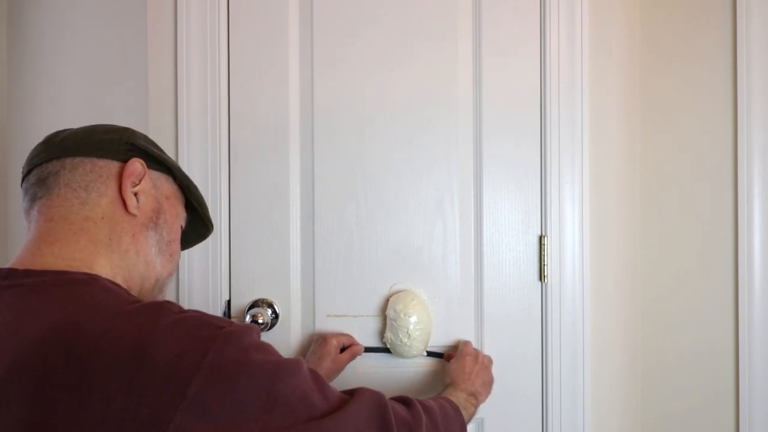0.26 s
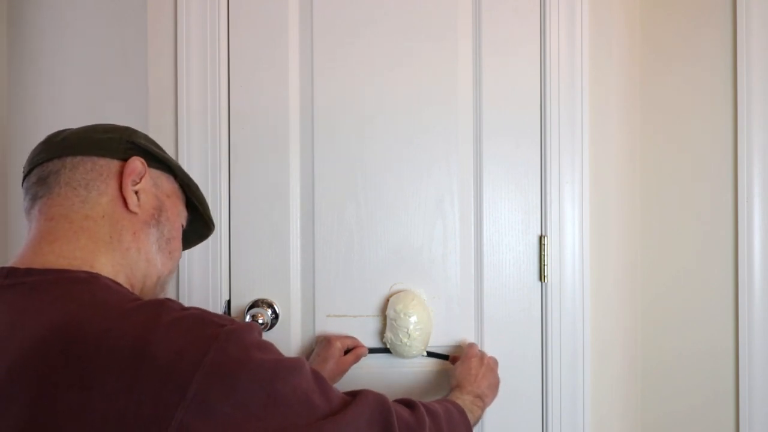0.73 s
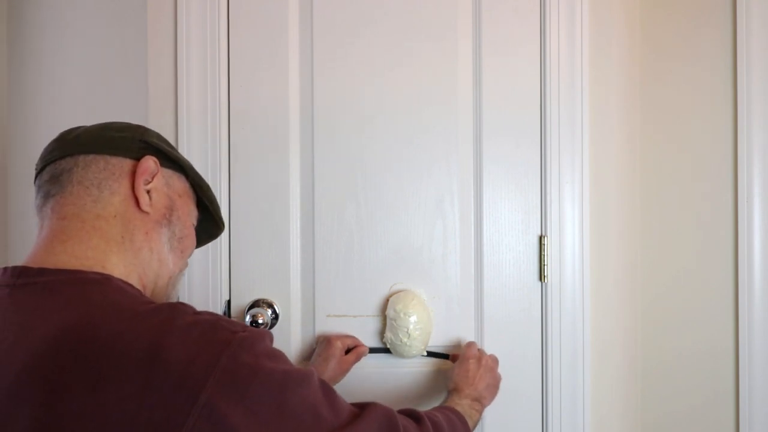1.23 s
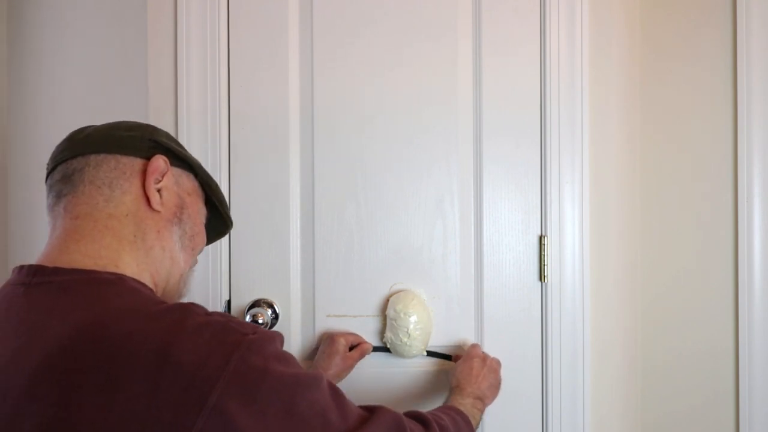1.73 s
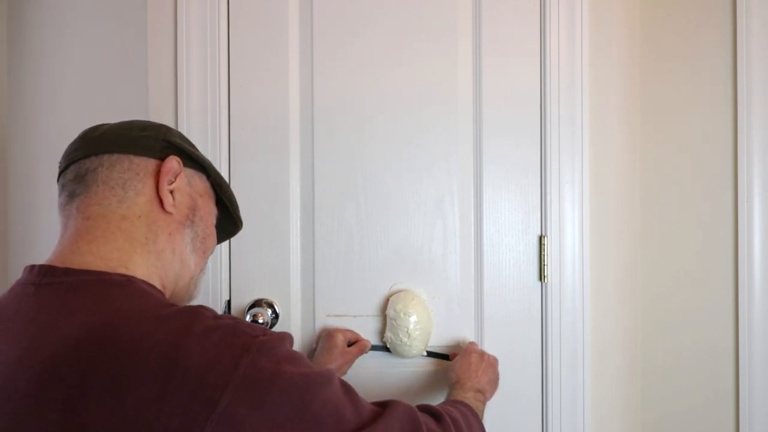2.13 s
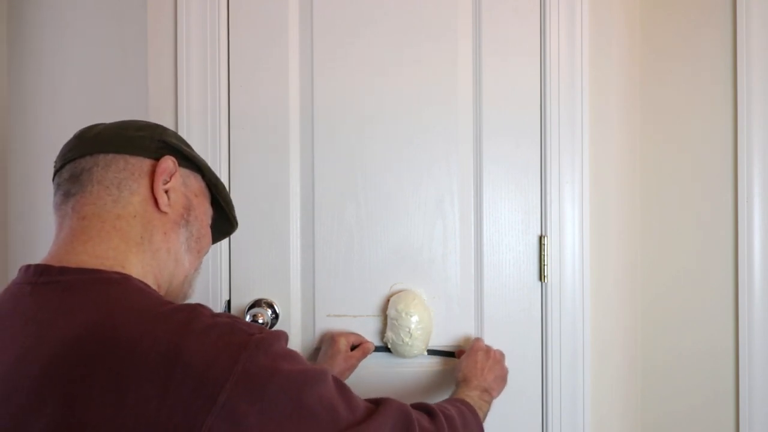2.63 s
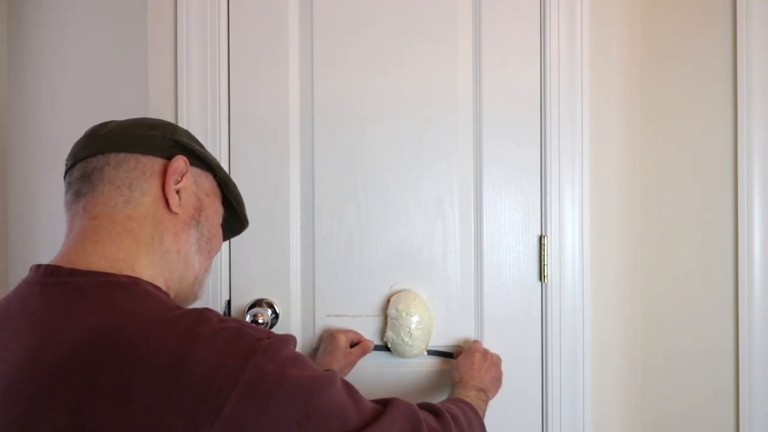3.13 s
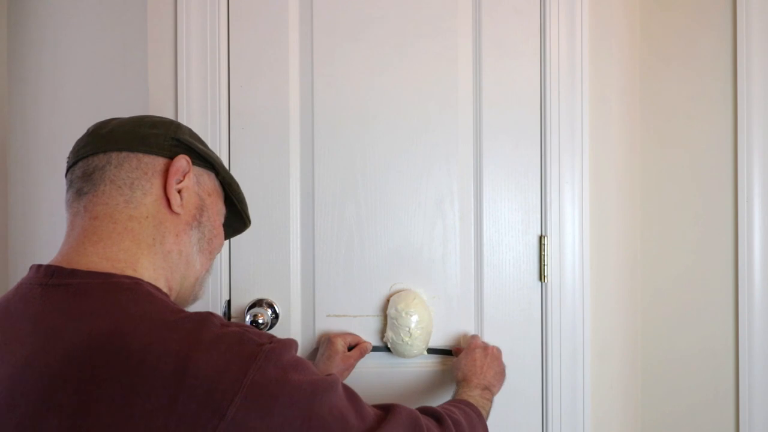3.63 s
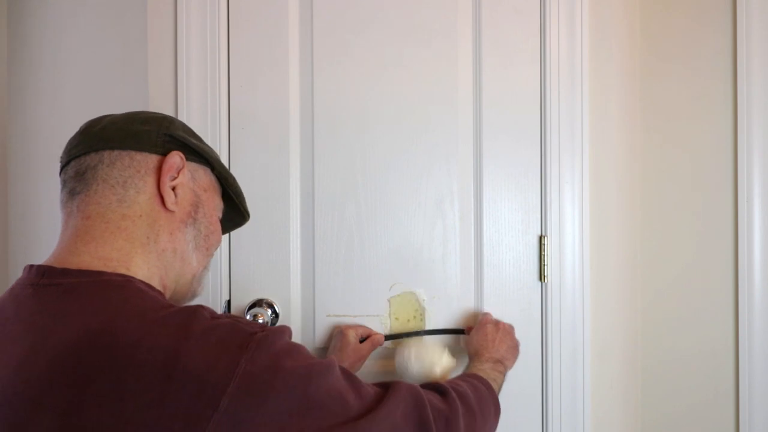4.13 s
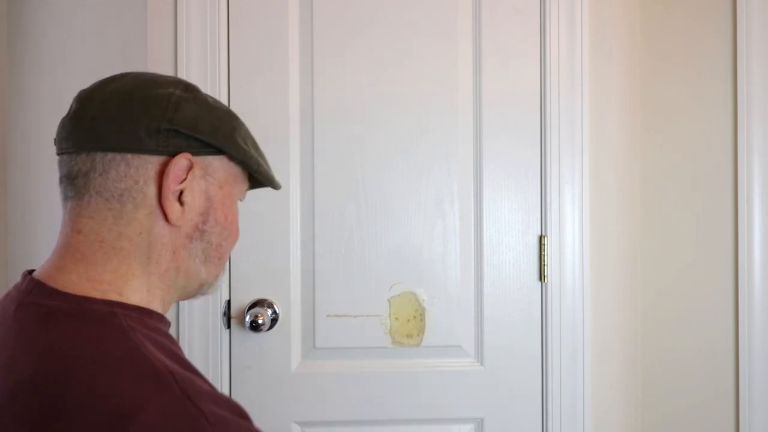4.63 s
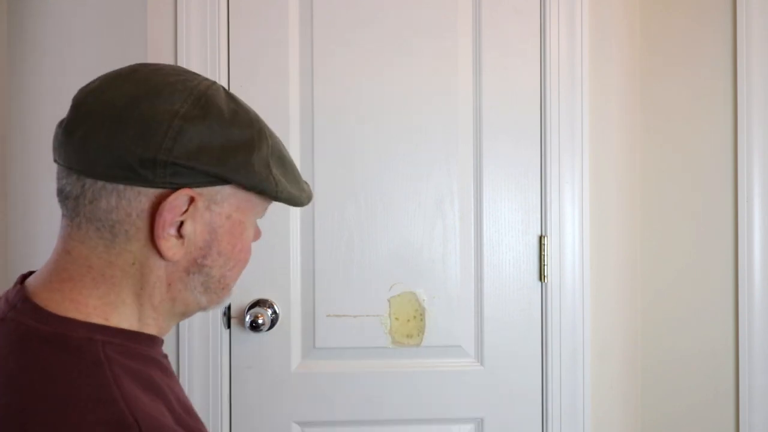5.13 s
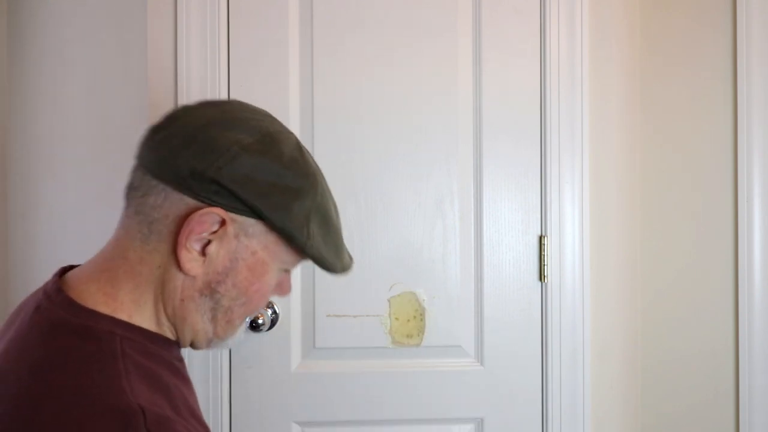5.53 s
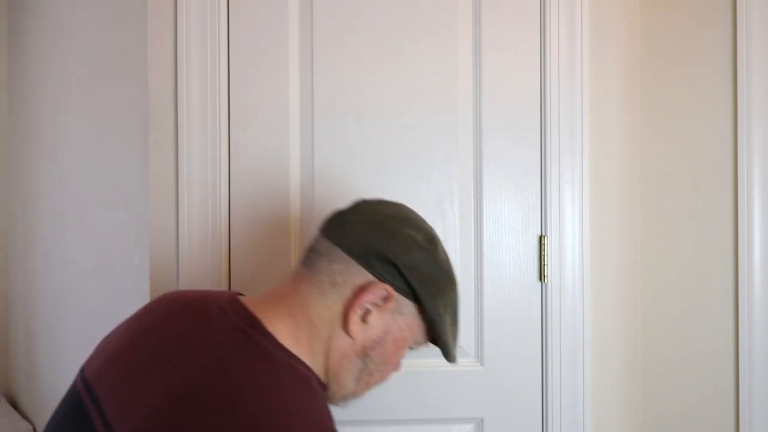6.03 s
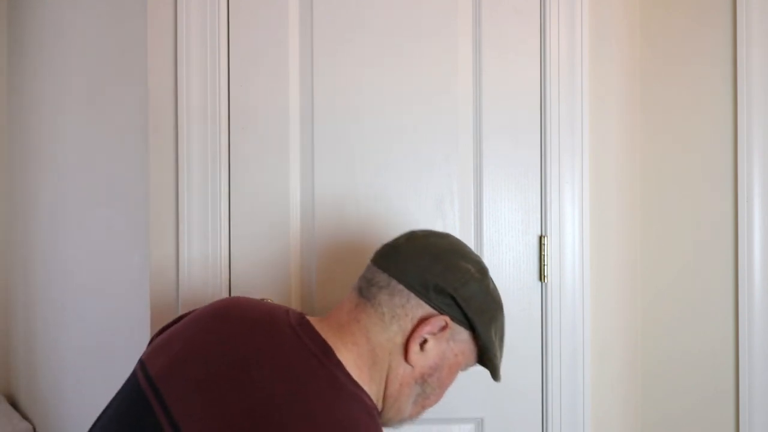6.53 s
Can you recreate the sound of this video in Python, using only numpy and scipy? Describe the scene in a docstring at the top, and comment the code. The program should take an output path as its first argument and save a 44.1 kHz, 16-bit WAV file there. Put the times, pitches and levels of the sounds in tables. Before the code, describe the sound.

A bare saw blade scrapes hard foam on a hollow door in scattered strokes, snaps it free, and the lump drops and bounces in a hallway.

```python
"""Hacksaw blade on hard foam, against a hollow door

A bare hacksaw blade, held flat against a hollow door, saws off a lump of hard foam in short strokes.
Random clicks and hiss are filtered into rasp, tearing and panel boom; bursts that ring modes make the foam
snaps and the lump's drop and bounces; rubs make its roll, the shuffling and the clothes. Gliding sines
squeak, and the bare blade pings. A bare hallway rings on; one microphone with a presence peak hears it.
"""
import sys
import numpy as np
from scipy import signal
from scipy.fft import rfft, irfft
from scipy.io import wavfile
from scipy.ndimage import uniform_filter1d

SR = 44100
rng = np.random.default_rng(int(sys.argv[2]) if len(sys.argv) > 2 else 0)


def ratio_of_db(decibels):
    """Turn decibels (scalar or array-like) into linear amplitude factors; 0 dB maps to 1."""
    return 10 ** (np.asarray(decibels, float) / 20)


def to_wav(sig):
    """Store sig (one row per channel, or 1-D mono) as 16-bit WAV at the path in sys.argv[1].

    Samples outside -1..1 are clipped; the rate is SR.
    """
    pcm = np.clip(np.atleast_2d(sig), -1, 1) * 32767
    pcm = np.round(pcm).astype(np.int16)
    wavfile.write(sys.argv[1], SR, pcm.T)  # frames by channels


N = 298539
T = np.arange(N) / SR  # seconds

# Foam snaps and knocks on the door. Each row: start in seconds, then the peaks of crack, treble, knock
# and thud in dB, before the four gains of the layer.
SNAPS = [(0.2797, -42, -59, -69, -60), (0.3176, -36.5, -65, -59, -60), (0.5493, -22, -47, -37, -37),
         (0.568, -11, -35, -20.5, -32), (0.5849, -27, -53, -11.5, -21.5), (0.9813, -35.5, -47, -60, -54),
         (1.176, -45, -52, -38, -43), (1.3254, -45, -60, -43, -31.5), (1.4072, -18.5, -37, -36, -40),
         (1.4293, -17, -33.5, -21.5, -52), (1.6895, -29, -47, -51, -64), (1.7175, -37, -47, -55, -54.5),
         (1.76, -26, -42.5, -31, -51), (2.0904, -34, -55, -36, -40), (2.1257, -12, -47, -29, -25.5),
         (2.1804, -21, -49, -28, -28), (2.2491, -23, -36, -33, -50), (2.6272, -5, -12, -50, -19.5),
         (3.006, -38, -50, -60, -66), (3.093, -33, -51, -62, -18.5), (3.121, -35, -66, -48, -49),
         (3.1584, -24.5, -44, -50, -26), (3.2589, -26, -36, -46, -42), (3.2834, -9, -25, -14.5, -13.5),
         (3.8368, -36, -39, -27, -10), (3.8543, -7, -23.5, -54, -32), (3.9499, 1.5, -18, -17, -11.5),
         (4.03, -6, -26.5, -14.5, -14), (4.0354, -31, -28.5, -20, -20), (4.3179, -33, -54, -37, -38)]
# The lump on the floor, and feet. Each row: start in seconds, then the peaks of crack, treble, knock
# and thud in dB, before the four gains of the layer.
BOUNCES = [(4.566, -2.5, -38, -9, -19), (4.8461, -7, -54, -10.5, -18.5), (4.9143, -17, -52, -15.5, -14),
           (4.964, -37, -46, -45, -44), (5.0502, -32, -53, -30.5, -44), (5.0679, -24.5, -56, -42, -39),
           (5.123, -24, -56, -50, -48.5), (5.1677, -28, -56.5, -35, -37), (5.212, -28, -43, -41.5, -50),
           (5.9046, -30, -53, -44.5, -53), (6.483, -27.5, -56, -44, -47.5), (6.6337, -19, -53, -40, -40.5)]
# Modes of the hollow door. Each row: frequency in Hz, relative level in dB, t60 in seconds.
DOOR = [(57, -11.5, 0.16), (89.1, -6, 0.29), (131, -1, 0.043), (171, 5, 0.087), (228, -0.5, 0.1),
        (309, 0, 0.031), (416.7, -4.5, 0.074), (525, -13, 0.094), (635, -2, 0.054), (760, -9, 0.015),
        (1018, -8, 0.023), (1153, -8.5, 0.06), (1443, -6, 0.056)]


def unit(x):
    """Scale to rms 1."""
    return x / np.sqrt(np.mean(x ** 2))


def colour(x, points):
    """Shape the spectrum by (Hz, dB) points on a log frequency axis."""
    hz, db = np.transpose(points)
    f = np.fft.rfftfreq(len(x), 1 / SR) + 1  # 1 Hz up, to keep the log finite
    gain = ratio_of_db(np.interp(np.log(f), np.log(hz), db))
    return irfft(rfft(x, len(x)) * gain, len(x))


def band(x, lo_hz, hi_hz):
    """Causal band-pass."""
    sos = signal.butter(2, [lo_hz, min(hi_hz, SR / 2.2)], "bandpass", fs=SR, output="sos")
    return signal.sosfilt(sos, x)


def ring(x, modes):
    """Resonant body: a sum of decaying modes (Hz, dB, t60 in seconds) driven by x."""
    out = 0
    for hz, db, t60 in modes:
        r = np.exp(-np.log(1000) / (t60 * SR))
        w = 2 * np.pi * hz / SR
        out = out + ratio_of_db(db) * signal.lfilter([0, np.sin(w)], [1, -2 * r * np.cos(w), r * r], x)
    return out


def grit(rate, spread_db):
    """Dense random clicks of uneven size (rate a second) over a smooth hiss, as of teeth on foam cells."""
    struck = rng.random(N) < rate / SR
    size = ratio_of_db(spread_db * rng.standard_normal(N).clip(-2, 2))
    clicks = struck * size * rng.choice([-1, 1], N)
    return unit(clicks) + 0.94 * rng.standard_normal(N)


def uneven(size):
    """Slow random wavering of rms 1: noise averaged twice over size samples."""
    return unit(uniform_filter1d(uniform_filter1d(rng.standard_normal(N), size=size), size=size))


def hallway_air():
    """Quiet air of the hallway: steady noise, strongest in the low bands."""
    # Spectrum of the air. Each row: frequency in Hz, relative level in dB per Hz.
    air_spectrum = [(82, -23), (140, -2.5), (252, -9.5), (361, -21.5), (428, -14.5), (801, -17),
                    (1240, -23), (2450, -31), (2910, -31), (3510, -25.5), (13000, -33)]
    return ratio_of_db(-57.5) * unit(colour(rng.standard_normal(N), air_spectrum))


def door_sway():
    """Deep bass: the door sways on its hinges under leaning hands, later the floor under the feet."""
    # Each row: time in seconds, level in dB.
    sway_level = [(0.0, -48.5), (0.21, -42), (0.49, -58.5), (0.62, -27), (0.7, -37.5), (1.2, -54.5),
                  (1.47, -35.5), (2.06, -55), (2.34, -33.5), (2.47, -52.5), (2.6, -31.5), (3.0, -45),
                  (3.45, -35.5), (3.49, -48), (3.58, -30), (3.83, -38.5), (3.85, -23.5), (4.16, -35.5),
                  (4.52, -58), (4.56, -55), (4.83, -62), (4.84, -50), (5.66, -65), (6.77, -56.5)]
    rumble = band(band(rng.standard_normal(N), 32, 105), 33, 116)
    boom = 0.0053 * ring(rng.standard_normal(N), DOOR[:2])  # the two lowest door modes
    return unit(rumble + boom) * ratio_of_db(np.interp(T, *np.transpose(sway_level)))


def creak():
    """A faint, short, soft tone whose phase wavers, as the worker bends."""
    # One row: start in seconds, end in seconds, frequency in Hz, level in dB.
    tone = (6.11, 6.19, 640, -49)
    start, end, hz, db = tone
    swell = np.sin(np.pi * np.clip((T - start) / (end - start), 0, 1))
    return ratio_of_db(db) * swell * np.sin(2 * np.pi * hz * T + 1.6 * uneven(300))


def pings():
    """The springy blade slaps the panel, and each slap rings the few modes of the blade."""
    # Each row: time in seconds, height of the driving impulse in dB.
    slap_rows = [(2.0905, -39.5), (2.1262, -17), (2.1805, -19), (3.1215, -42), (1.7600, -38)]
    # Each row: frequency in Hz, relative level in dB, t60 in seconds.
    blade_modes = [(1406, 1, 0.023), (2640, -5, 0.03), (3530, -12, 0.027)]
    slaps = np.zeros(N)
    for s, db in slap_rows:
        slaps[int(s * SR)] = ratio_of_db(db)
    return ring(slaps, blade_modes)


def squeaks():
    """Foam on steel: short gliding whistles, their level and phase smeared by uneven grip."""
    # Each row: start in seconds, end in seconds, start in Hz, end in Hz, level in dB, roughness (0 = pure).
    glides = [(1.47, 1.486, 14200, 9900, -29.5, 0.14), (2.253, 2.254, 13100, 13500, -17, .05),
              (2.26, 2.308, 13700, 12500, -43, 1.1), (2.55, 2.592, 12900, 13600, -26, 0.6),
              (2.575, 2.624, 13870, 14200, -28, 0.7)]
    out = np.zeros(N)
    grip = uneven(40)
    for start, end, hz0, hz1, db, rough in glides:
        u = np.clip((T - start) / (end - start), 0, 1)
        phase = 2 * np.pi * np.cumsum(hz0 + (hz1 - hz0) * u) / SR
        swell = np.sqrt(np.sin(np.pi * u).clip(0))
        smear = 1 - rough + rough * grip
        out += ratio_of_db(db) * swell * smear * np.sin(phase + 2 * rough * grip[::-1])
    return out


def chatter():
    """The blade sticks and slips: a run of tiny ringing ticks, uneven in spacing and size."""
    # One row: start in seconds, end in seconds, typical ticks a second, pitch in Hz, typical impulse in dB.
    tick_run = (2.640, 2.785, 110, 13700, -38)
    start, end, rate, hz, db = tick_run
    chance = rng.standard_normal((40, 2))
    times = start + np.cumsum(np.exp(0.14 * chance[:, 0])) / rate
    ticks = np.zeros(N)
    ticks[(times * SR).astype(int)] = ratio_of_db(db + 2.6 * chance[:, 1]) * (times < end)
    return ring(ticks, [(hz, 0, 0.006), (1.06 * hz, -4, 0.005)])


def blows(table, modes, crack_s, gains_db):
    """Each blow: a spike with a few ms of splinter noise, in two bands, and a push that rings the body."""
    out = np.zeros(N + SR)
    t = T[:SR // 3]
    push = np.exp(-t / 0.00036)
    rings = np.array([ring(push, [mode]) for mode in modes])
    for s, *dbs in table:
        burst = rng.standard_normal(len(t)) * np.exp(-t / crack_s)
        burst[0] = 4.0  # the spike
        crack = band(burst, 1270, 3870) + 0.71 * band(burst, 2670, 3190)
        treble = band(burst, 3600, 10200)
        # every blow lands on another spot, so the modes share it differently
        body = ratio_of_db(4.0 * rng.standard_normal(len(modes))) @ rings
        knock = band(body, 556, 1530)
        thud = band(band(body, 103, 505), 35, 610)
        i = int(s * SR)
        for part, db, gain_db in zip((crack, treble, knock, thud), dbs, gains_db):
            out[i:i + len(t)] += ratio_of_db(db + gain_db) * part / np.abs(part).max()
    return out[:N]


def lump_and_feet():
    """The lump drops and bounces, then feet step: blows that ring the modes of the lump."""
    # Each row: frequency in Hz, relative level in dB, t60 in seconds.
    lump_modes = [(146, -11, 0.24), (239, 18.5, 0.09), (377.3, 12.5, 0.086), (444, 0, 0.033),
                  (534, -17, 0.089), (820, -19, 0.057), (1474, 1.5, 0.026)]
    return blows(BOUNCES, lump_modes, 0.0053, (0.59, 3.7, 6.3, 6.7))


def foam_snaps():
    """Foam snaps and knocks on the door: blows that ring the modes of the panel."""
    return blows(SNAPS, DOOR, 0.0028, (-2.0, 9.5, -2.5, -2.5))


def rub_gains():
    """Gains of rasp, coarse part, tearing and panel: each rub rises, sags and fades over light contact."""
    # Saw strokes. Each row: start in seconds, length in seconds, rasp in dB, then coarse part, fine tearing
    # and panel in dB over the rasp. Levels are before the sag and the trims in rubbing().
    stroke_rows = [(0.532, 0.054, -25.5, 6, -13, -4.5), (0.727, 0.067, -49.5, 7.5, -18, 11.5),
                   (1.38, 0.12, -36.5, 0.5, -4.5, 5), (1.553, 0.065, -54, -3, 4.5, 6),
                   (1.683, 0.054, -49.5, 2.5, -10, -14), (1.756, 0.035, -47.5, 4.5, -5, 2),
                   (2.121, 0.087, -30.5, 3, -25, -17), (2.199, 0.074, -33, 3.5, -7, 7),
                   (2.513, 0.14, -35, 3.5, -1, 6), (2.624, 0.11, -25, -8.5, -5.5, -11),
                   (3.104, 0.39, -49, -5, -1.5, 6), (3.225, .06, -30.5, -13, -4.5, -15),
                   (3.289, 0.075, -22, 2.5, -9.5, 7.5), (3.453, 0.29, -40, -1, -7, 2),
                   (3.585, 0.18, -34, -3, -4.5, 3), (3.85, 0.014, -29, -2, -7, 4.5),
                   (3.873, 0.072, -31.5, 1.5, -3.5, 15.5), (3.938, 0.073, -30.5, 2, -7.5, 11),
                   (4.028, 0.032, -32, -9, -4.5, 9.5), (4.091, .13, -42, 7.5, -16, 14),
                   (4.275, 0.054, -48, 2.5, -8, 2)]
    # The lump skids and rolls, then shoes and clothes scuff. Each row: the same columns, start and length
    # in seconds, then rasp, coarse part, tearing and panel in dB.
    scuff_rows = [(4.566, 0.026, -19, -12, -13, 3), (4.60, 0.1, -26.5, 0, -23, 1.5),
                  (4.844, 0.029, -24, 3.5, -15, 4), (4.875, 0.12, -34, 4, -7.5, 11),
                  (5.0, 0.3, -39, 2.5, -13, 2), (5.188, 0.19, -41.5, -19, -2, -12),
                  (5.389, 0.27, -47.5, -25, -3, -14), (5.72, 0.13, -49.5, -1.5, -7, 6),
                  (5.904, 0.025, -44, -4, -19, -10), (6.483, 0.02, -43, -13, -5, -9),
                  (6.54, 0.1, -43.5, -5, -7, -16), (6.603, 0.1, -30, -3.5, -6.5, -9)]
    # Light contact of blade, hands and sleeves between the rubs. Each row: time in seconds, rasp in dB,
    # then tearing and panel in dB over the rasp.
    brush_rows = [(0.0, -60, -11, 2), (0.26, -67, -6, 8), (0.31, -63, -7, -17), (0.51, -58, 3, -15),
                  (0.9, -67.5, -4, 23), (1.11, -64, -14, 2), (1.18, -58, -10, 7.5), (1.39, -58.5, -1, 9),
                  (1.56, -53.5, 1.5, 5), (1.68, -54.5, -0.5, 1), (1.98, -62, -3, 8), (2.1, -54.5, -3, 3),
                  (2.45, -55, -3, -3), (2.9, -65, -4, 13), (2.98, -59.5, 2, -18), (3.08, -56, -10, -12),
                  (4.4, -66, -8, 8), (4.55, -67.5, 7, 12), (5.68, -54.5, -4, -17), (6.02, -55, -2.5, -12),
                  (6.19, -54, 1, -24), (6.46, -50, -1, -32), (6.77, -57, -9, -10)]
    # Fades after the end of a rub. One row: rasp, coarse part, tearing and panel in dB per second.
    fade_rates = (189, 148, 238, 152)
    ease_s, jolt_s, set_off_s = 0.05, 0.0057, 0.006
    ease_db, sag_db_per_s, brush_coarse_db = 23, 48, -6.5
    s, db, tear_db, panel_db = np.transpose(brush_rows)
    over_rasp = (0, brush_coarse_db, tear_db, panel_db)
    power = np.array([ratio_of_db(np.interp(T, s, db + d)) ** 2 for d in over_rasp])
    hits = np.array([row[0] for row in SNAPS + BOUNCES])
    for s, length, db, *over_db in stroke_rows + scuff_rows:
        # a rub eases in, or rises almost at once when a blow sets it off
        rise = jolt_s if np.abs(hits - s).min() < set_off_s else ease_s
        i = slice(int(s * SR), int((s + length + 0.5) * SR))
        t = T[i] - s
        ease = ease_db * (1 - t / rise).clip(0)
        sag = sag_db_per_s * (np.minimum(t, length) - rise).clip(0)
        held = db - ease - sag
        for row, (d, fade) in enumerate(zip([0] + over_db, fade_rates)):
            power[row, i] += ratio_of_db(held + d - fade * (t - length).clip(0)) ** 2
    return np.sqrt(power)


def rubbing():
    """Teeth rasp and tear the foam cells, and pushes as gritty as theirs shake the door panel."""
    # Spectrum of the rasp. Each row: frequency in Hz, relative level in dB per Hz.
    rasp_spectrum = [(1000, -14), (1700, -5.5), (2120, -3), (2300, 0), (3300, 2.5), (4570, -8), (6140, -17),
                     (7000, -19), (9100, -26), (15400, -120)]
    # Spectrum of the fine tearing. Each row: frequency in Hz, relative level in dB per Hz.
    tear_spectrum = [(2940, 0), (5000, 1.5), (7670, -3), (9600, -5), (10800, -10), (15100, -16),
                     (16000, -64)]
    rasp_gain, coarse_gain, tear_gain, panel_gain = rub_gains()
    teeth = grit(600, 3.7)
    rasp = unit(colour(teeth, rasp_spectrum)) * rasp_gain
    coarse = unit(band(0.0088 * ring(teeth, DOOR) + teeth, 350, 1633)) * coarse_gain * ratio_of_db(-4.0)
    tear = unit(colour(grit(3300, 2.1), tear_spectrum)) * tear_gain
    push = grit(300, 5.7)
    shaken = 0.041 * ring(push, DOOR) + 3 * band(push, 94, 470)
    panel = unit(band(shaken, 139, 670)) * panel_gain * ratio_of_db(-7.0)
    return rasp + coarse + tear + panel


def hall(x):
    """Bare hallway: direct sound plus a diffuse tail of noise bands, each with its own decay."""
    # Each row: band centre in Hz, t60 in seconds, nominal level in dB over the direct sound.
    hall_bands = [(118.4, 1, -6.5), (255, 0.45, 2.5), (529, 0.48, -0.5), (912, 0.56, -4), (1940, 0.54, -3),
                  (4150, 0.52, -5), (8000, 0.25, -12), (14000, 0.16, -7)]
    t = T[:SR]
    onset = np.minimum(t / 0.0015, 1)
    tail = np.zeros(SR)
    for hz, t60, db in hall_bands:
        noise = band(rng.standard_normal(SR), hz / 1.396, hz * 1.38)
        decaying = unit(noise * ratio_of_db(-60 * t / t60) * onset)
        tail += ratio_of_db(db) * decaying * np.sqrt(hz / SR / SR)  # energy in proportion to bandwidth
    return x + signal.fftconvolve(x, tail)[:N]


def scene():
    """Saw, lump, worker and squeaks ring in the hall, over door sway and quiet air; both channels alike."""
    small = creak() + pings() + squeaks() + chatter()
    near = small + lump_and_feet() + foam_snaps() + rubbing()
    mid = hall(near) + door_sway() + hallway_air()
    return np.array([mid, mid])


def band_limit(x):
    """A steep low-pass at the top of the band."""
    return signal.sosfilt(signal.butter(12, 16810, fs=SR, output="sos"), x)


def record(dry):
    """One microphone's colour, faint hiss of two converters, clipped peaks and a cut top."""
    # Presence peak with a steep upper edge. Each row: frequency in Hz, gain in dB.
    mic_response = [(1500, -0.5), (2600, -1), (3100, 0), (3700, 1), (3950, -1.5), (5000, -0.5),
                    (7000, -1.5)]
    hiss_tilt = [(60, 10.5), (1500, 0), (16000, 2)]  # Hz, dB
    noise = rng.standard_normal(dry.shape)  # unrelated left and right
    hiss = ratio_of_db(-66) * np.array([colour(channel, hiss_tilt) for channel in noise])
    clipped = np.clip(colour(dry[0], mic_response) + hiss, -0.86, 0.86)
    top_cut = signal.ellip(8, 0.2, 70, 16300, fs=SR, output="sos")  # low-pass at 16300 Hz
    return band_limit(signal.sosfilt(top_cut, clipped))


dry = scene()
out = record(dry)
to_wav(out)
```